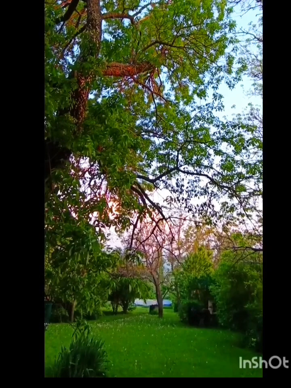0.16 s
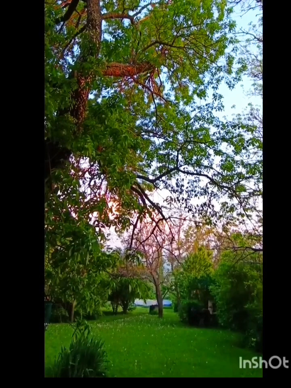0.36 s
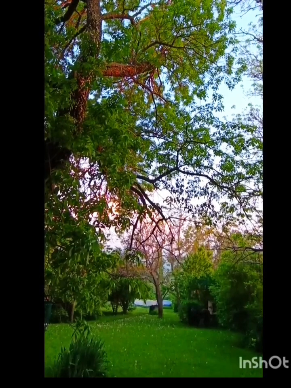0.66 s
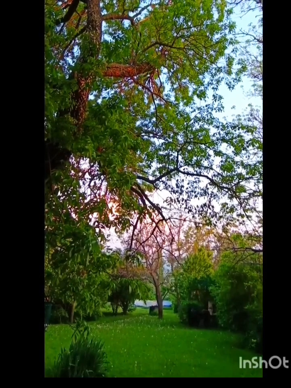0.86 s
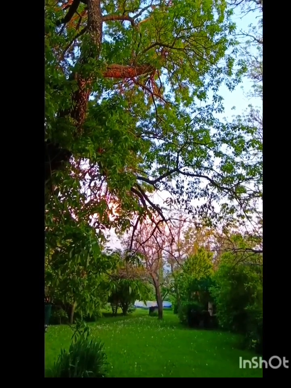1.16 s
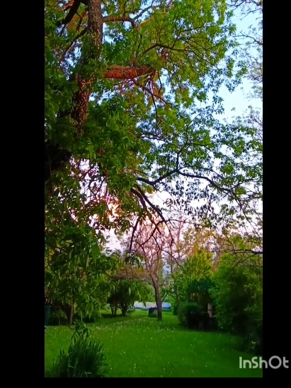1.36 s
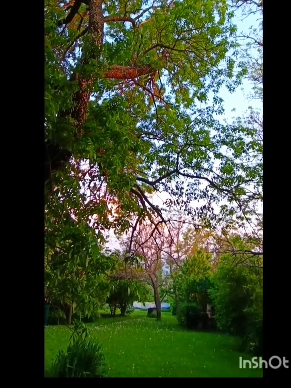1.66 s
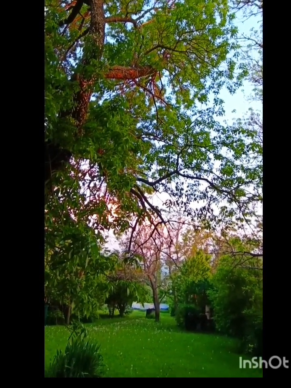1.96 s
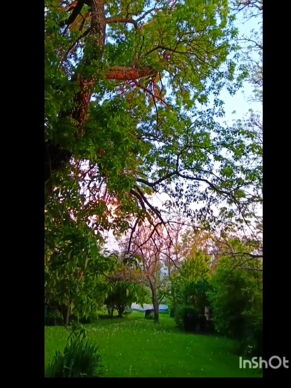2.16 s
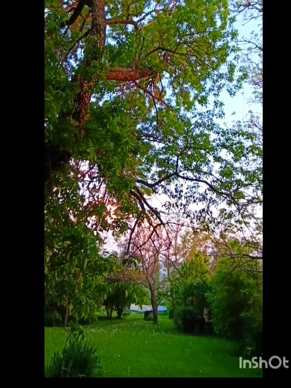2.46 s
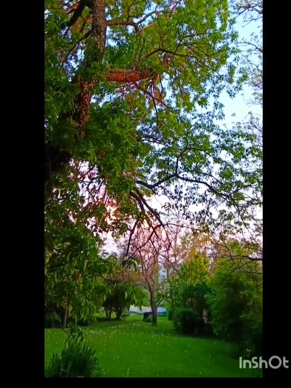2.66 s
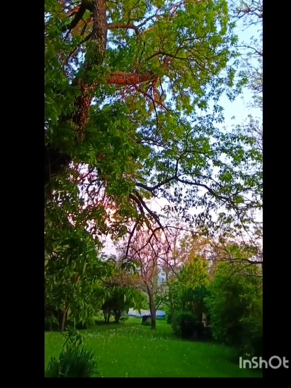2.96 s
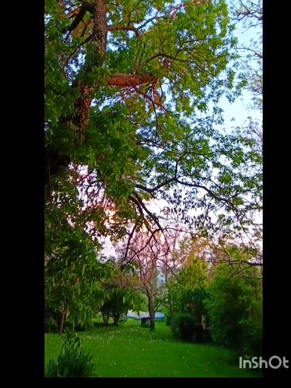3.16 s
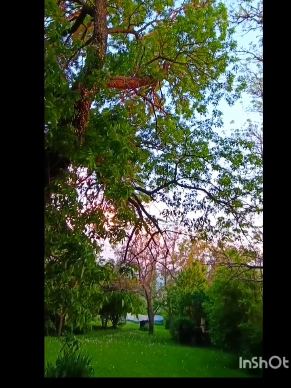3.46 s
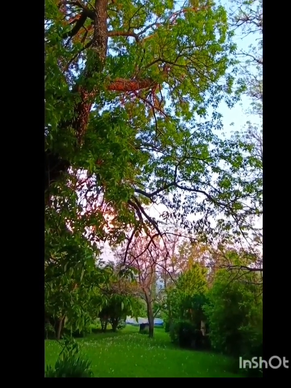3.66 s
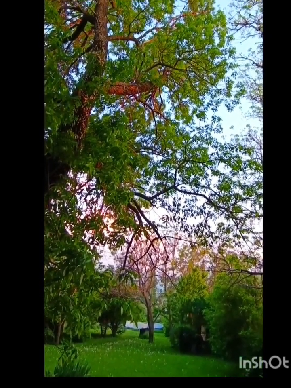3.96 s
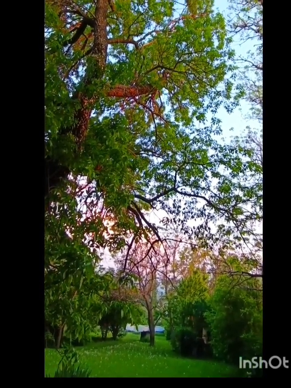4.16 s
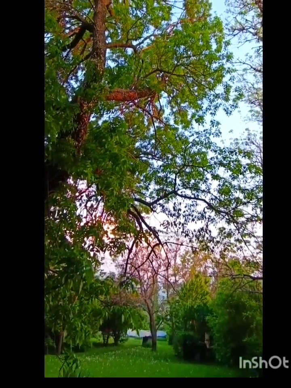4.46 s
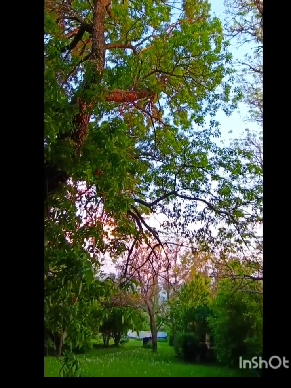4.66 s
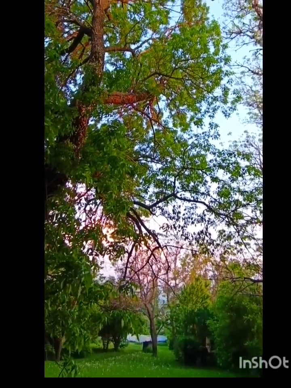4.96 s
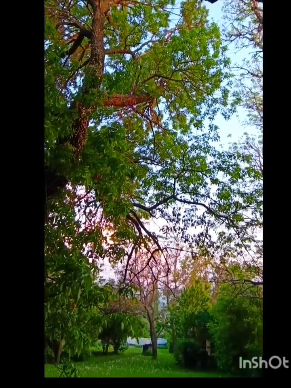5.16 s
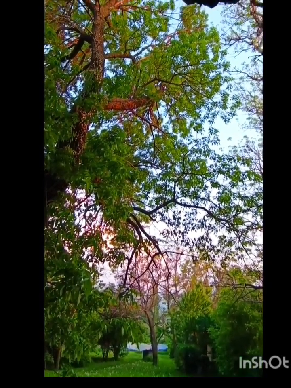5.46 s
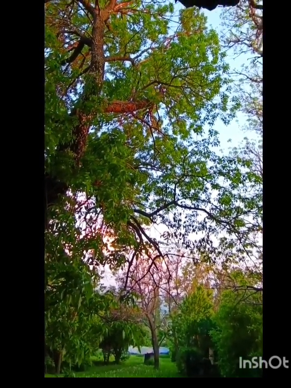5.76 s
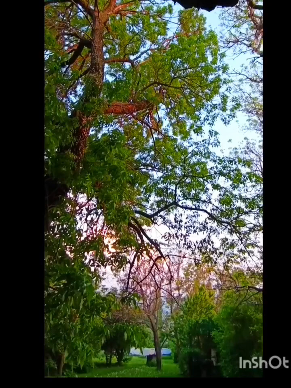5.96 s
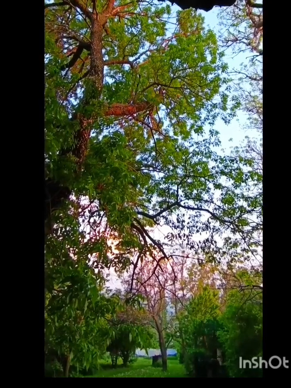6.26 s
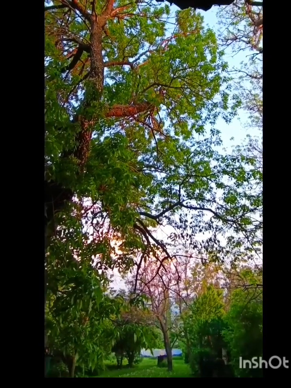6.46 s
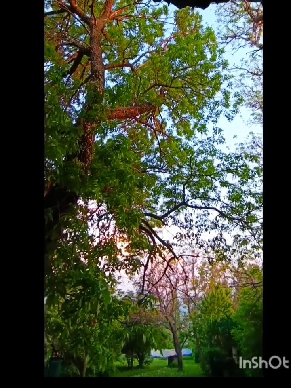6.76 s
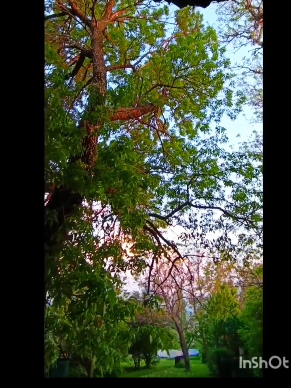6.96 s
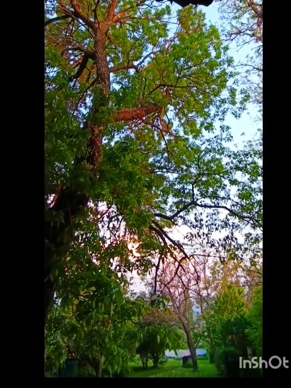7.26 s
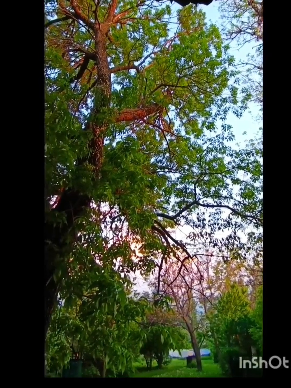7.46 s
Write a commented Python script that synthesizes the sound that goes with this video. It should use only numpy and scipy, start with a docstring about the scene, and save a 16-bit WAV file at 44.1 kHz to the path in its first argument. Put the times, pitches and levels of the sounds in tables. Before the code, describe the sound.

Small birds squeal, warble, chirp and twitter in a slightly echoing garden, with a few hisses over a low background hum.

```python
"""Small birds call in an echoing space. Loud buzzing squeals and a warble come first, then seven
arched notes, a sharp hiss, whistles and high twitters. A warble and a squeal return, two hoarse hisses
follow, and the low background hum fades at the end. Each near voice is one gliding, frequency-modulated
tone that gains harmonics and rasp when forced; each perch has its own echoes. Distant whistles,
rustles, soft bumps and one snap are scattered behind the song."""
import sys
import numpy as np
from scipy import signal
from scipy.fft import rfft, irfft
from scipy.io import wavfile
from scipy.ndimage import uniform_filter1d, map_coordinates

SR = 44100
rng = np.random.default_rng(int(sys.argv[2]) if len(sys.argv) > 2 else 0)


def dump(signal):
    """Clip the signal to [-1, 1] and save it as 16-bit WAV at the path in sys.argv[1]."""
    limited = np.clip(np.atleast_2d(signal).T, -1, 1)
    pcm = np.round(limited * 32767).astype(np.int16)
    wavfile.write(sys.argv[1], SR, pcm)


N = 336042
TIME = np.arange(N) / SR
PROGRESS = np.linspace(0, 1, 200)  # fraction of a stretch of song elapsed

# Levels are relative: envelopes, gains and echoes act on them.
# Squeals: (squeak onset [s], croak level [dB], then for the squeak and again for the buzz:
# length [s], pitch [Hz], level [dB], trill depth [Hz], harshness [dB])
SQUEALS = [(0.265, -32, .028, 5070, -26.5, 50, 5, 0.13, 2400, -22.5, 206, -7),
           (0.923, -42, 0.028, 5090, -24, 30, 3, 0.13, 2684, -24, 180, -6),
           (5.658, -33.5, .039, 4900, -29.5, 360, 0, 0.11, 2363, -22, 260, -8.5)]
# Warbles: (swoop onset [s], croak level [dB], swooping length [s], dips [count], swoop level [dB],
# trill depth [Hz], top pitch [Hz], held length [s], held level [dB])
WARBLES = [(0.659, -35, .066, 1, -15.5, 70.4, 3074, .07, -25.5),
           (5.352, -42, 0.042, 3, -21.5, 182, 2941, 0.026, -31)]
# Arched notes: (plunge time [s], level [dB], top pitch [Hz])
ARCHES = [(1.38, -36, 3003), (1.631, -35.5, 2992), (1.886, -35, 2973), (2.15, -36, 2960), (2.43, -37, 2965),
          (2.706, -37, 2975), (3.01, -36.5, 2902)]
# High twitters: (time [s], level [dB], last pitch [Hz])
TWITTERS = [(4.549, -37.5, 4785), (4.7, -31, 4930), (4.836, -29.5, 4940), (4.98, -29, 4977),
            (5.009, -46, 4250), (5.134, -45.5, 4560)]
# Whistles, one curve each: (time [s], pitch [Hz], level [dB], trill depth [Hz])
WHISTLES = [
    [(.003, 1878, -38, 40), (.034, 1990, -36.5, 150), (.044, 2334, -27.5, 80), (.051, 1440, -43, 60),
     (.07, 1220, -51, 30)],
    [(3.98, 1494, -63, 80), (4.015, 1732, -39.5, 210), (4.043, 2166, -41, 30), (4.2, 2348, -48, 98),
     (4.25, 2497, -45, 30), (4.35, 2406, -45.5, 18), (4.46, 2375, -58, 20), (4.54, 2790, -55, 22)],
    [(4.1, 2290, -44, 101), (4.125, 3070, -49, 121), (4.18, 3240, -68, 60), (4.25, 2676, -46, 250),
     (4.278, 2040, -34.5, 120), (4.335, 1677, -47, 60), (4.365, 1630, -49, 40)],
    [(4.585, 1970, -46.5, 17), (4.65, 1922, -43.5, 18), (4.68, 1988, -35.5, 15), (4.735, 2094, -36, 59),
     (4.765, 2720, -39.5, 620), (4.79, 3040, -36.5, 180), (4.815, 3210, -36.5, 61), (4.86, 3120, -47, 90)],
]
# Peeps: (time [s], length [s], first pitch [Hz], last pitch [Hz], level [dB], trill depth [Hz],
# harshness [dB])
PEEPS = [(.89, 0.025, 1730, 1740, -26.5, 12, -1), (3.165, 0.0586, 3820, 4240, -49.5, 340, -14),
         (4.993, 0.076, 1936, 2080, -46, 220, -84), (5.144, 0.063, 2025, 1826, -46, 160, -13),
         (6.54, 0.073, 4380, 4510, -55, 200, 11), (7.585, 0.029, 2870, 3200, -62.5, 75, 13.5)]
# Tone colour of the overtones and rasp, with a bright peak near 10 kHz: (frequency [Hz], gain [dB])
OVERTONE_COLOUR = [(2000, 10.5), (3300, -2), (4200, -6.5), (5200, -16), (6000, 2), (7200, -4), (8400, -26),
                   (9150, -2), (9600, -0.5), (10100, 7.5), (10700, -0.5), (11600, -21), (16000, -66)]
RASP_COLOUR = [(100, -6.5), (700, -0.5), (1400, 3.5), (3000, 5), (4000, 9), (5400, 6), (7300, 8.5),
               (8400, 1), (9400, 9.5), (10100, -3.5), (11000, -8), (11800, -51), (16000, -46)]
# Hisses: (time [s], rise [s], hold [s], fall [s], level [dB])
SHARP_HISSES = [(3.39, 0.3, 0.11, 0.15, -38)]
HOARSE_HISSES = [(5.8, .03, 0.662, 0.028, -39), (6.6, 0.14, 0.01, 0.13, -48.5)]
# Distant birds: (time [s], length [s], first pitch [Hz], last pitch [Hz], level [dB])
FAR_WHISTLES = [(0.828, 0.071, 1300, 1197, -40.5), (1.04, 0.075, 1300, 1200, -43),
                (1.05, 0.091, 745, 781, -49.5), (1.175, 0.07, 1530, 1617, -50),
                (1.212, 0.082, 3620, 3830, -46), (1.42, 0.22, 1530, 1553, -61),
                (1.697, 0.087, 1510, 1570, -52), (3.16, 0.14, 1000, 1026, -59),
                (3.36, 0.22, 1120, 1278, -57), (3.796, 0.055, 1778, 1810, -42.5),
                (4.106, 0.078, 1510, 1650, -53), (4.248, 0.11, 1240, 1230, -50),
                (4.333, 0.09, 950, 890, -52), (4.452, 0.112, 1230, 1440, -56.5),
                (4.848, 0.17, 1200, 1364, -53), (6.733, 0.112, 3050, 2807, -63),
                (6.926, 0.14, 3550, 3670, -69)]
# Dry rustles and rattles: (time [s], nominal length [s], level [dB])
RUSTLES = [(-0.01, 0.091, -40.5), (2.285, 0.054, -54.5), (2.599, 0.11, -55.5), (2.698, 0.053, -53.5),
           (2.926, 0.04, -52), (3.094, 0.053, -52.5), (3.156, 0.093, -53.5), (6.496, 0.039, -44),
           (6.548, 0.017, -44), (6.573, 0.021, -44), (6.598, 0.017, -47.5), (6.622, 0.02, -43),
           (7.037, 0.05, -59.5), (7.36, 0.062, -59), (7.566, 0.17, -53.5)]
# One thin snap: (time [s], level [dB], decay time [s])
SNAP = (1.213, -29.5, 0.0017)
# Soft low bumps: (time [s], frequency [Hz], level [dB])
BUMPS = [(0.164, 58.7, -38.5), (0.9, 93, -35.5), (3.81, 87.6, -40)]
# Spectra of the noise sources: (frequency [Hz], gain [dB])
SHARP_COLOUR = [(290, -38), (500, -22), (861, -13.5), (1030, -15), (1730, 2), (2040, -1.5), (2700, -10.5),
                (3150, -3), (3420, -6.5), (5350, -10.5), (5740, -14), (6970, -9.5), (8840, -25),
                (10000, -19), (14000, -42)]
HOARSE_COLOUR = [(240, -19), (400, -12.5), (640, -15), (781, -7), (1010, -12), (1210, -1), (1440, -7.5),
                 (1680, -2.5), (1860, -7), (2370, -8), (3900, -27), (6420, -29), (7290, -19), (8290, -37),
                 (12000, -36), (15600, -45), (22000, -120)]
RUSTLE_COLOUR = [(80, -45), (300, -1.5), (700, -7), (1700, 6), (2900, 2.5), (3700, -1), (4500, 2),
                 (5400, -2), (6600, 2), (7600, -5), (8600, -23.5), (10700, -6.5), (12000, -22.5),
                 (15000, -21.5)]
SNAP_COLOUR = [(100, -30), (6000, 2), (8000, -11), (10300, 6), (12000, -34), (16000, -20)]
HUM_COLOUR = [(25, -26), (45, -15.5), (65, -2), (86, 3.5), (125, -4), (250, -5), (500, -9.5), (1300, -10),
              (2400, -15), (3600, -20), (7600, -27.5), (10300, -28.5), (12000, -29), (15800, -32)]
# Envelope of the hum: (time [s], level [dB])
HUM_LEVEL = [(0, -50), (.9, -48.5), (2.2, -52), (3.2, -52.5), (4, -50), (4.9, -53), (5.8, -50.5),
             (6.8, -52.5), (7.3, -61.5), (7.62, -60)]
# Likeness of the hum in both ears: (frequency [Hz], correlation [ratio])
HUM_CORRELATION = [(40, 0.69), (90, 0.62), (200, 0.48), (500, 0.44), (1000, 0), (16000, 0.054)]
# Reverberation of the space: (frequency [Hz], time to fall 60 dB [s])
ECHO_T60 = [(300, 0.82), (1500, 0.35), (3000, 0.65), (6000, 0.49), (11000, 0.42)]
# Microphone imbalance: (frequency [Hz], left boost and right cut [dB])
MIC_LEAN = [(100, -.6), (1500, -1.6), (2600, 0), (5000, 1), (8000, .8), (10200, 3.6), (13000, .6)]


def syrinx(rows, trill_hz=185, trill_spread=.106, jitter=.0076, flutter_db=2, throb=.38):
    """Frequency modulation trills one tone: returns its onset and (fundamental, overtones, forcing)."""
    times, *columns = np.transpose(rows)
    t = np.arange(times.min(), times.max(), 1 / SR)
    hz, db, depth, harsh_db = (np.interp(t, np.sort(times), column) for column in columns)
    trill = 2 * np.pi * np.cumsum(trill_hz * (1 + trill_spread * wander(len(t), 146.5))) / SR
    pitch = hz * (1 + jitter * wander(len(t), 489.7)) + depth * np.sin(trill)
    phase = 2 * np.pi * np.cumsum(pitch) / SR
    level = gain_of(db + flutter_db * wander(len(t), 203.2))
    level *= 1 - throb * np.tanh(depth / 200) * np.cos(trill)  # downward slides are the louder ones
    level *= np.sqrt(2) * np.clip(np.minimum(t - t[0], t[-1] - t) / .0008, 0, 1)
    overtones = sum(gain_of(-6 - 7 * (k - 2)) * np.sin(k * phase) * (k * (hz + depth) < SR / 2)
                    for k in range(2, 6))
    forcing = level * gain_of(harsh_db)
    return times.min(), np.array([level * np.sin(phase), forcing * overtones, forcing])


def song(call, table, rasp_db, full_voice_db=-30):
    """Source and filter: pure fundamentals carry coloured overtones and rasp that grow with forcing."""
    parts = np.zeros((3, N))
    for row in table:
        add(parts, *syrinx(call(*row)))
    tone, overtones, forcing = parts
    rasp = abs(forcing) * (abs(forcing) / gain_of(full_voice_db)) ** .2
    return tone + coloured(overtones, OVERTONE_COLOUR) + gain_of(rasp_db) * rasp * noise(RASP_COLOUR)


def stretch(start, length, hz, db, depth_hz, harsh_db, join_s=.003):
    """Control curves for the syrinx, ending early so that the voice glides into the next stretch."""
    times = start + (length - join_s) * PROGRESS
    return np.column_stack(np.broadcast_arrays(times, hz, db, depth_hz, harsh_db))


def envelope(length, attack_s, release_s, onset_db):
    """Amplitude envelope in dB: an exponential attack, a hold and a linear release."""
    t = length * PROGRESS
    release = np.clip((length - t) / release_s, 1e-3, 1)
    return onset_db * np.maximum(1 - t / attack_s, 0) + 20 * np.log10(release)


def croak(end, db, length=.04, first_hz=1101, last_hz=1678, swell_db=18.5):
    """Strong forcing makes the climb into a loud call rich in harmonics."""
    hz = first_hz + (last_hz - first_hz) * PROGRESS ** 2
    return stretch(end - length, length, hz, db - swell_db * (1 - PROGRESS), depth_hz=55, harsh_db=6.5)


def squeal(start, croak_db, squeak_s, squeak_hz, squeak_db, squeak_depth, squeak_harsh_db, *buzz_row):
    """Register breaks: the voice jumps from a croak to a squeak, then down about an octave to a buzz."""
    return np.vstack([croak(start, croak_db),
                      squeak(start, squeak_s, squeak_hz, squeak_db, squeak_depth, squeak_harsh_db),
                      buzz(start + squeak_s, *buzz_row)])


def squeak(start, length, hz, db, depth_hz, harsh_db, overshoot=.13, wobble_hz=57, settle_s=.00956):
    """The pitch overshoots and settles as a damped oscillation, while the level swells and falls."""
    t = length * PROGRESS
    pitch = hz * (1 + overshoot * np.exp(-t / settle_s) * np.cos(2 * np.pi * wobble_hz * t))
    swell_db = -7.5 * (1 - np.exp(-((PROGRESS - .66) / .21) ** 2))
    return stretch(start, length, pitch, db + swell_db, depth_hz, harsh_db)


def buzz(start, length, hz, db, depth_hz, harsh_db, drop=.33, drop_s=.014, sag_hz_per_s=1100):
    """A deeply modulated tone relaxes exponentially onto its pitch from above, and sags."""
    t = length * PROGRESS
    pitch = hz * (1 + drop * np.exp(-t / drop_s)) - sag_hz_per_s * t
    swell_db = envelope(length, attack_s=.037, release_s=.02, onset_db=-5)
    return stretch(start, length, pitch, db + swell_db, depth_hz, harsh_db)


def warble(start, croak_db, swoop_s, dips, swoop_db, depth_hz, top_hz, held_s, held_db):
    """Resonance: after a croak, swoops peak as they cross the throat's pitch; the last top is held."""
    low_hz, throat_hz, half_width_hz, fade_db_per_s = 1594, 2480, 240, 101.5
    hurried = PROGRESS ** 1.3  # the swoops come ever faster
    hz = low_hz + (top_hz - low_hz) * abs(np.sin(np.pi * (round(dips) + .5) * hurried))
    throat_db = -10 * np.log10(1 + ((hz - throat_hz) / half_width_hz) ** 2)
    swell_db = -6 * (1 - PROGRESS)
    swoops = stretch(start, swoop_s, hz, swoop_db + throat_db + swell_db, depth_hz, harsh_db=-6)
    fading_db = held_db - fade_db_per_s * held_s * PROGRESS
    held = stretch(start + swoop_s, held_s, top_hz, fading_db, depth_hz=12, harsh_db=-3)
    return np.vstack([croak(start, croak_db), swoops, held])


def arch(plunge_time, db, top_hz, climb_s=.11, climb_hz=614.3, plunge_s=.0084, plunge_hz=1407):
    """A frequency sweep climbs a parabola to a rounded top and is loudest in the plunge that follows."""
    length, top_lead_s = climb_s + .0247, .032
    t = length * PROGRESS - climb_s
    below_top = (np.minimum(t + top_lead_s, 0) / (climb_s - top_lead_s)) ** 2
    hz = top_hz - climb_hz * below_top - plunge_hz / (1 + np.exp(-t / plunge_s))
    swell_db = np.minimum(171 * t, -324 * t)  # rise and fall in dB/s
    crack = np.exp(-((t + .017) / .0064) ** 2)  # the voice roughens as it tips over
    return stretch(plunge_time - climb_s, length, hz, db + swell_db,
                   depth_hz=35 + 105 * crack, harsh_db=-9.5 + 10.5 * crack)


def twitter(start, db, last_hz, length=.07, climb_hz=952, step_hz=225, steps_per_s=52):
    """Waning frequency modulation: a high note climbs in wobbling steps and steadies at the top."""
    wobble = step_hz * np.cos(2 * np.pi * steps_per_s * length * PROGRESS) * (1 - PROGRESS ** 2)
    hz = last_hz - climb_hz * (1 - PROGRESS) ** 1.7 - wobble
    swell_db = envelope(length, attack_s=.044, release_s=.037, onset_db=-10)
    return stretch(start, length, hz, db + swell_db, depth_hz=328 * (1 - PROGRESS), harsh_db=-9.5)


def whistle(*points, harsh_db=-14.5):
    """Weak forcing leaves a nearly pure tone that follows its curve."""
    return [(*point, harsh_db) for point in points]


def peep(start, length, first_hz, last_hz, db, depth_hz, harsh_db):
    """A short linear frequency sweep carries the trill."""
    hz = first_hz + (last_hz - first_hz) * PROGRESS
    swell_db = envelope(length, attack_s=.0061, release_s=.017, onset_db=-12)
    return stretch(start, length, hz, db + swell_db, depth_hz, harsh_db)


def hiss(table, colour, db, flutter_db, range_db=21.5):
    """Amplitude-modulated noise swells, holds and dies away with a slight flutter."""
    swell = np.zeros(N)
    for start, rise_s, hold_s, fall_s, level_db in table:
        opening = 1 - (TIME - start) / rise_s
        closing = (TIME - start - rise_s - hold_s) / fall_s
        shut = np.maximum(np.maximum(opening, closing), 0)
        swell += gain_of(level_db + db - range_db * shut)
    return uniform_filter1d(swell, size=1500) * gain_of(flutter_db * wander(N, 120)) * noise(colour)


def far_birds(waver=.021, distance_db=-2.5):
    """Plain wavering glides swell and fade, attenuated by distance."""
    out = np.zeros(N)
    for start, length, first_hz, last_hz, db in FAR_WHISTLES:
        count = int(length * SR)
        hz = np.linspace(first_hz, last_hz, count) * (1 + waver * wander(count, 144))
        tone = signal.windows.tukey(count, .5) * np.sin(2 * np.pi * np.cumsum(hz) / SR)
        add(out, start, gain_of(db) * unit_rms(tone))
    return gain_of(distance_db) * out


def rustles(grain_db=5):
    """Random amplitude modulation roughens noise bursts that rise quickly and fall more slowly."""
    level = np.zeros(N)
    for start, length, db in RUSTLES:
        age = np.arange(int(2 * length * SR)) / (length * SR / 3)  # in rise times
        add(level, start, gain_of(db) * age * np.exp(1 - age))
    return level * gain_of(grain_db * wander(N, 600)) * noise(RUSTLE_COLOUR)


def snap():
    """A transient of treble noise decays exponentially."""
    start, db, decay_s = SNAP
    return gain_of(db) * (TIME > start) * np.exp(-abs(TIME - start) / decay_s) * noise(SNAP_COLOUR)


def bumps(rise_s=.017):
    """Heavily damped low oscillations last a few cycles each."""
    out, t = np.zeros(N), TIME[:SR // 4]
    swell = t / rise_s * np.exp(1 - t / rise_s)
    for start, hz, db in BUMPS:
        add(out, start, gain_of(db) * swell * np.sin(2 * np.pi * hz * t))
    return out


def hum(db=3.5, patch_db=1.7):
    """Partly coherent background noise, alike in both ears only in the bass, drifts in small patches."""
    correlation = read(HUM_CORRELATION, np.fft.rfftfreq(N, 1 / SR))
    left = noise(HUM_COLOUR)
    right = irfft(correlation * rfft(left) + np.sqrt(1 - correlation ** 2) * rfft(noise(HUM_COLOUR)), N)
    hz, _, spectra = signal.stft(np.array([left, right]), SR, nperseg=1024)
    patches = uniform_filter1d(rng.standard_normal(spectra.shape[1:]), size=4, axis=0)
    patches = unit_rms(uniform_filter1d(patches, size=9, axis=1))
    drift_db = patch_db * patches / (1 + hz[:, None] / 5000)  # the treble stays smooth
    drifting = signal.istft(spectra * gain_of(drift_db), SR, nperseg=1024)[1][:, :N]
    return drifting * gain_of(db + np.interp(TIME, *np.transpose(HUM_LEVEL)))


def surroundings(x, echo_s=.015, tail_db=-4, echo_db=-3, direct_db=-1.2, early_db=-6.5):
    """Convolution with direct sound, one distinct echo, early reflections and a diffuse tail."""
    count = 32768
    t = np.arange(count) / SR
    hz, when, spectra = signal.stft(reflections(count, per_s=3000) * (t > .006), SR, nperseg=256)
    decay = gain_of(-60 * when / read(ECHO_T60, hz)[:, None])
    tail = signal.istft(spectra * decay, SR, nperseg=256)[1][:, :count]
    early = reflections(count, per_s=900) * np.exp(-t / .014) * (t > .001)
    response = sum(gain_of(db) * part / np.linalg.norm(part, axis=1, keepdims=True)
                   for db, part in [(early_db, early), (tail_db, tail)])
    # the direct sound reaches the left ear three samples late; the echo comes from the other side
    response[[0, 1], [3, 0]] += gain_of(direct_db)
    response[[0, 1], round(echo_s * SR) + np.array([0, 8])] += gain_of(echo_db)
    return signal.fftconvolve(x[None], response, axes=1)[:, :N]


def reflections(count, per_s):
    """Scattering: impulses of random sign reach each ear at random times."""
    return rng.choice([-1., 1.], (2, count)) * (rng.random((2, count)) < per_s / SR)


def perch(x, left_db, echo_s, tail_db, echo_db=-8):
    """An interaural level difference and the echoes of its own spot place a bird."""
    return surroundings(x, echo_s, tail_db, echo_db) * gain_of([[left_db / 2], [-left_db / 2]])


def gain_of(db):
    """Decibels to amplitude ratio."""
    return 10 ** (np.asarray(db) / 20)


def unit_rms(x):
    """Normalises to rms 1."""
    return x / np.sqrt(np.mean(x ** 2) + 1e-20)


def read(points, hz):
    """Interpolates a table on a log-frequency axis."""
    knots_hz, values = np.transpose(points)
    return np.interp(np.log(hz + 1), np.log(knots_hz + 1), values)


def coloured(x, colour):
    """Zero-phase filtering by a (frequency [Hz], gain [dB]) table."""
    return irfft(rfft(x) * gain_of(read(colour, np.fft.rfftfreq(N, 1 / SR))), N)


def noise(colour):
    """Filtered Gaussian noise of rms 1."""
    return unit_rms(coloured(rng.standard_normal(N), colour))


def wander(count, hz):
    """A smooth random signal of spread about 1 that changes hz times a second."""
    knots = rng.standard_normal(4096)
    return map_coordinates(knots, [np.arange(count) * hz / SR], order=3, mode="wrap")


def add(mix, start, sound):
    """Superposes a sound on the mix from start [s]."""
    part = mix[..., max(round(start * SR), 0):][..., :sound.shape[-1]]
    part += sound[..., :part.shape[-1]]


def scene():
    """Superposition of perched birds, echoing hisses, rustles and a snap, over the hum and bumps."""
    squeals = perch(song(squeal, SQUEALS, rasp_db=-14), left_db=0, echo_s=.013, tail_db=-4)
    warbles = perch(song(warble, WARBLES, rasp_db=-18.5), left_db=-.2, echo_s=.015, tail_db=-2.5)
    arches = perch(song(arch, ARCHES, rasp_db=-30), left_db=.5, echo_s=.025, tail_db=-3, echo_db=-4)
    twitters = perch(song(twitter, TWITTERS, rasp_db=-4), left_db=-2.5, echo_s=.016, tail_db=-5.5)
    whistler = perch(song(whistle, WHISTLES, rasp_db=-15) + song(peep, PEEPS, rasp_db=-13),
                     left_db=3, echo_s=.018, tail_db=.5)
    distant = perch(far_birds(), left_db=-1, echo_s=.028, tail_db=-1)
    birds = squeals + warbles + arches + twitters + whistler + distant
    sharp = hiss(SHARP_HISSES, SHARP_COLOUR, db=-1, flutter_db=-3)
    hoarse = hiss(HOARSE_HISSES, HOARSE_COLOUR, db=-3.5, flutter_db=.4)
    return birds + surroundings(sharp + hoarse + rustles() + snap()) + hum() + bumps()


def record(dry, cutoff_hz=15850):
    """Frequency response: the left microphone is brighter, the right fuller; both are band-limited."""
    left = coloured(dry[0], MIC_LEAN)
    right = coloured(dry[1], np.array(MIC_LEAN) * [1, -1])
    lowpass = signal.firwin(511, cutoff_hz, window=("kaiser", 9), fs=SR)
    return signal.oaconvolve(np.array([left, right]), lowpass[None], "same")


dry = scene()
out = record(dry)
dump(out)
```